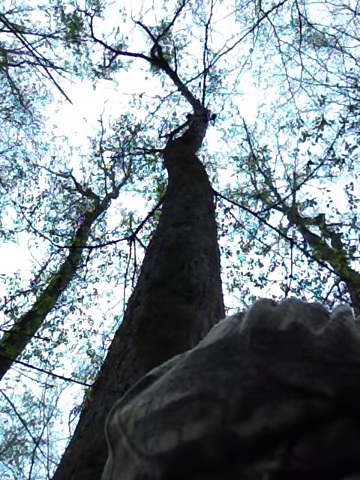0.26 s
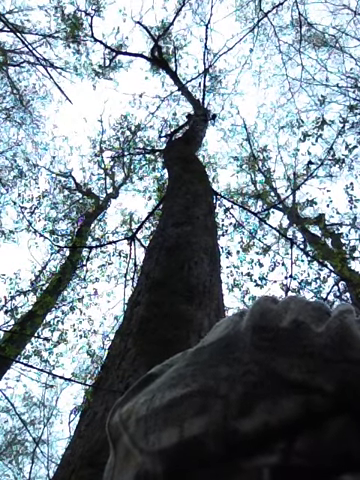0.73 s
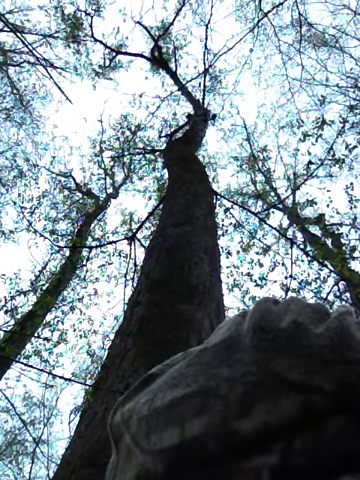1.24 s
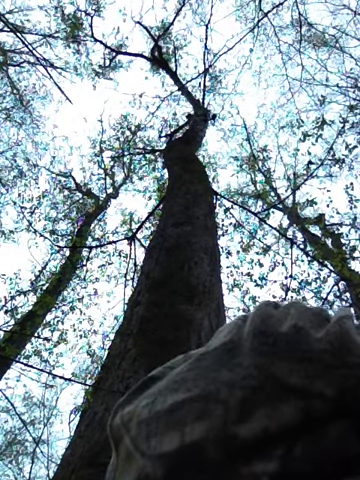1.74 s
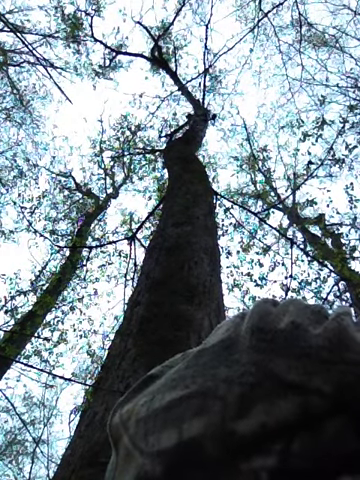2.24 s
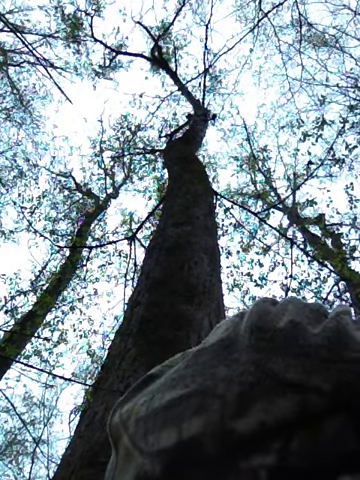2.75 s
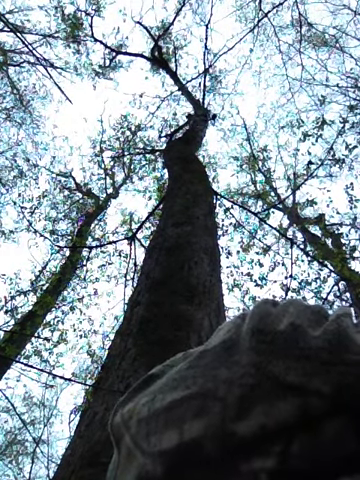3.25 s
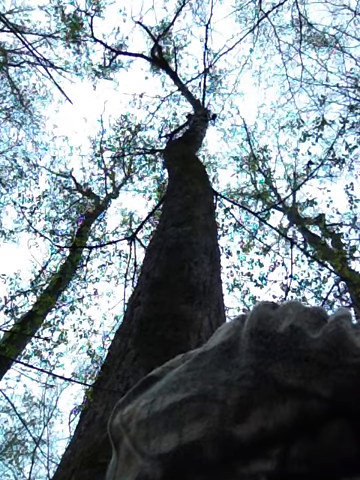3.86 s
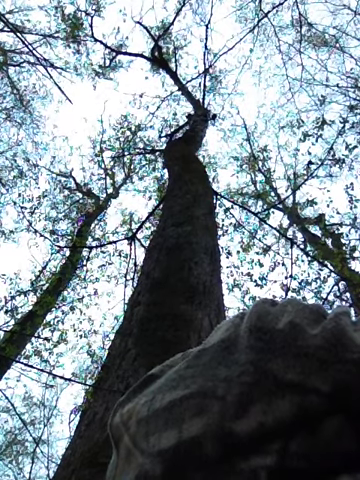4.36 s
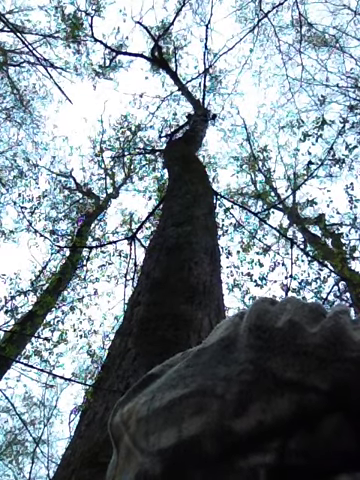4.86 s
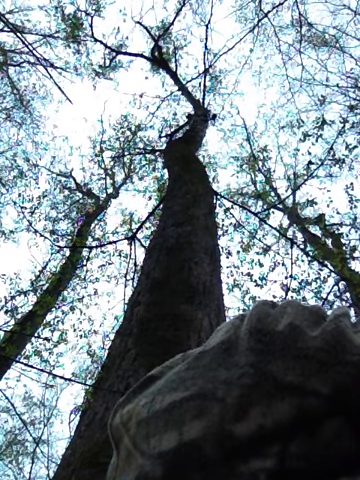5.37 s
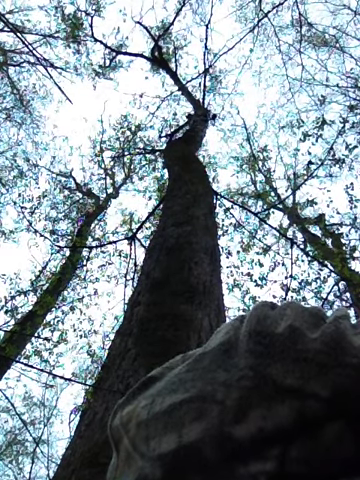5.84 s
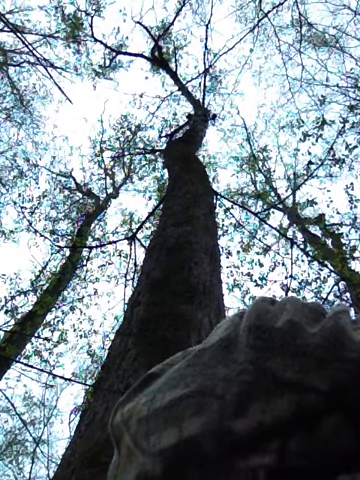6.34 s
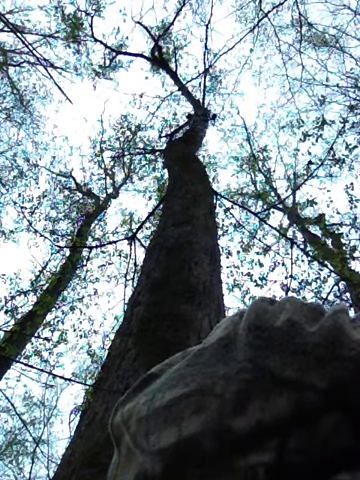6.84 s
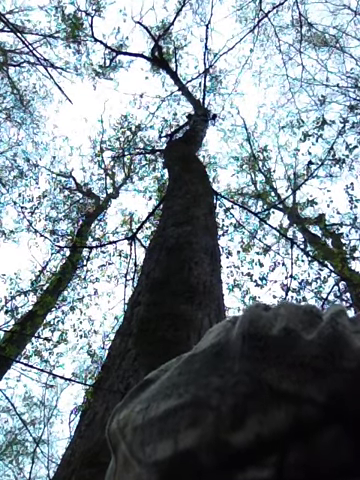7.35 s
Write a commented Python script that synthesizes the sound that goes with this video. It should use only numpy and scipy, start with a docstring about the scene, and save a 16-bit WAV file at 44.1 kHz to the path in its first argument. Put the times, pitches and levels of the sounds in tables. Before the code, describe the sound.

A wild turkey calls loudly, close to the microphone, in still woodland. From about 0.8 to 1.9 seconds it gives five clipped clucks that grow louder, each popping open and breaking upward in pitch. In the pause that follows, a few twigs tick very faintly. Three quick clucks come between 3.1 and 3.5 seconds, then two softer ones at about 4.3 and 4.5 seconds. From 4.9 to 6.8 seconds the turkey gives six slightly longer, raspier rising yelps, evenly spaced at nearly three a second. Every note leaves a faint echo among the trees. At about 7.3 seconds there is a soft, dull knock with a tiny dry snap. Throughout, the background stays very quiet: a low rumble, a steady, slightly crackling hiss and the barely audible hum of a distant engine.

```python
"""Still woodland, one microphone close to a turkey: clipped clucks in short runs, then six longer yelps.
Each note pops open, scoops down and sweeps up as the membranes of the syrinx pulse through the
resonances of throat and beak. A nearby trunk throws back treble and the trees scatter a faint tail.
A few twigs tick and a soft double knock comes near the end. Far off an engine hums, under a low
rumble and a steady, faintly crackling hiss."""
import sys
import numpy as np
from scipy import signal
from scipy.fft import rfft, irfft
from scipy.io import wavfile
from scipy.ndimage import map_coordinates

SR = 44100
rng = np.random.default_rng(int(sys.argv[2]) if len(sys.argv) > 2 else 0)


def materialize(psi):
    """Save the field psi as 16-bit PCM at rate SR to the path in sys.argv[1].

    A 1-D psi becomes a single channel; in a 2-D psi each row is a channel.
    """
    bounded = np.clip(np.atleast_2d(psi).T, -1, 1)
    quanta = np.round(bounded * 32767).astype(np.int16)
    wavfile.write(sys.argv[1], SR, quanta)


N = 335160
TIME = np.arange(N) / SR


def clucks():
    """Clipped notes close to the microphone: the syrinx snaps open and the pitch breaks upward."""
    # t/s, length/s, low pitch/Hz, rise/Hz, level/dB, swell/dB, beak f/Hz, beak level/dB, brightness/dB
    notes = [(.7782, 0.029, 631.5, 221, -31, -7, 2200, -7.5, -0.5),
             (.9292, .027, 658, 205, -24.5, -4, 2230, -4.5, 0),
             (1.1975, 0.059, 678, 234, -20, 7, 2225, -6, 1),
             (1.5338, .039, 666.5, 272, -19, 6.5, 2314, -7, 2),
             (1.8708, 0.04, 673, 280, -18.5, 1, 2320, -5.5, 3.5),
             (3.1182, 0.028, 680.7, 255.5, -23, 1.5, 2370, -8.5, 1),
             (3.2734, 0.028, 634.6, 347, -19.5, -7.5, 2400, -10, 1.5),
             (3.4916, 0.034, 650.3, 404, -18, -2, 2480, -12, -0.5),
             (4.2546, .029, 623.4, 297, -24.5, -2, 2480, -9.5, -2),
             (4.5391, 0.066, 695.7, 165, -29, 9.5, 2260, -14.5, -3.5)]
    # throat resonances: f/Hz, width/Hz, level/dB
    throat = [(965, 166, 4.5), (1453, 243, -7.5), (1793, 320, -5), (2827, 130, -21.5), (3623, 310, -9),
              (4427, 200, -18.5), (6990, 280, -38)]
    return turkey(notes, throat, attack_s=.0051, release_s=.012, glide_share=.4, break_s=.011,
                  sag_db=1, sag_lead_s=.014, sag_width_s=.007, scoop_hz=168.5, scoop_s=.004,
                  jitter=.013, rasp_db=-10, catch_s=.0093, pressed_db=-8.5)


def yelps():
    """Longer, raspier notes from the same spot: a slower opening and a deeper sag in air pressure."""
    # t/s, length/s, low pitch/Hz, rise/Hz, level/dB, swell/dB, beak f/Hz, beak level/dB, brightness/dB
    notes = [(4.8982, 0.09, 629.6, 338.5, -27.5, 4.5, 2350, -10, -1.5),
             (5.2732, 0.07, 610.6, 384, -21.5, 4.5, 2360, -15, -1),
             (5.6519, .076, 629.3, 376, -20.5, 5, 1910, -11, 0),
             (6.0274, 0.072, 620, 372.6, -20.5, 5.5, 2080, -4, -1),
             (6.3924, 0.069, 625.7, 353, -21.5, 4, 2044, -1, 0),
             (6.7672, 0.064, 620, 388, -20.5, -1, 2024, -3, -2)]
    # throat resonances: f/Hz, width/Hz, level/dB
    throat = [(984, 183, 2.5), (1499, 316, 0), (1761, 274, -2), (3090, 910, -14.5), (3773, 424, -15.5),
              (4520, 180, -34.5), (7130, 270, -38)]
    return turkey(notes, throat, attack_s=.01, release_s=.0091, glide_share=.45, break_s=.013,
                  sag_db=2.5, sag_lead_s=.032, sag_width_s=.02, scoop_hz=265.4, scoop_s=.003,
                  jitter=.015, rasp_db=-7.5, catch_s=.015, pressed_db=-2.5)


def turkey(notes, throat, attack_s, release_s, glide_share, break_s, sag_db, sag_lead_s, sag_width_s,
           beak_width_hz=260, size=6144, **voicing):
    """Each note is a short push of air through the syrinx, coloured by throat and beak."""
    out, t, hz = np.zeros(N), TIME[:size], np.fft.rfftfreq(size, 1 / SR)
    for s, length, low_hz, rise_hz, db, swell_db, beak_hz, beak_db, bright_db in notes:
        opening = ease(t / attack_s) * ease((length - t) / release_s)
        pitch_hz = low_hz + rise_hz * pitch_rise(t, length, glide_share, break_s)
        effort = from_db(db + air_pressure(t, length, swell_db, sag_db, sag_lead_s, sag_width_s))
        voice = effort * (pop(t) + syrinx(t, pitch_hz, opening, **voicing))
        resonances = [*throat, (beak_hz, beak_width_hz, beak_db)]
        colour = tract(hz, resonances, bright_db) * antiresonance(hz)
        add(out, s, resonate(voice, colour))
    return out


def syrinx(t, pitch_hz, opening, scoop_hz, scoop_s, jitter, rasp_db, catch_s, pressed_db,
           mellow=.85, flutter_db=6.5, catch_db=9, pressed_hz=720, free_hz=900, count=12):
    """Membrane pulses: the pitch starts sharp and sags; barely driven, the swing is almost a sine."""
    # the membrane catches roughly before it settles into its swing
    catch = from_db(catch_db * np.exp(-t / catch_s))
    hz = (pitch_hz + scoop_hz * np.exp(-t / scoop_s)) * (1 + jitter * catch * drift(1400, len(t)))
    phase = 2 * np.pi * np.cumsum(hz) / SR
    overtone = np.arange(count)[:, None]
    # uneven closure makes the high overtones flutter, each on its own
    level_db = flutter_db * overtone / count * np.array([drift(150, len(t)) for _ in overtone])
    # the low, pressed part of a note has a weak fundamental, which fills out as the pitch rises
    level_db[0] += np.interp(hz, [pressed_hz, free_hz], [pressed_db, 0])
    pulses = (np.cos((overtone + 1) * phase) * from_db(level_db) * opening ** (mellow * overtone)).sum(0)
    shimmer = 1 + .09 * catch * drift(500, len(t))
    # turbulence comes in a puff with every cycle, brighter than the tone, and starts ahead of it
    turbulence = signal.lfilter(*signal.butter(1, 1600, "high", fs=SR), rng.standard_normal(len(t)))
    rasp = from_db(rasp_db) * catch * (1 + np.cos(phase)) * turbulence
    return opening * pulses * shimmer + np.sqrt(opening) * rasp


def pitch_rise(t, length, glide_share, break_s, lead_s=.0043):
    """Share of the rise: a steady glide steepens into an upward break and tops out just before the end."""
    top_s = length - lead_s
    held = np.minimum(t, top_s)
    return glide_share * held / top_s + (1 - glide_share) * np.exp((held - top_s) / break_s)


def air_pressure(t, length, swell_db, sag_db, sag_lead_s, sag_width_s):
    """The push behind a note in dB: it swells or fades evenly, and sags before the voice breaks upward."""
    along = np.minimum(t / length, 1)
    sag = np.exp(-((t - length + sag_lead_s) / sag_width_s) ** 2)
    return swell_db * (along - .5) - sag_db * sag


def pop(t, db=-12, hz=880, rise_s=.0018):
    """As the syrinx opens, the first puff of air sets the throat ringing for a few cycles."""
    return from_db(db) * t / rise_s * np.exp(1 - t / rise_s) * np.sin(2 * np.pi * hz * t)


def tract(hz, resonances, bright_db, low_hz=690, bright_hz=2700, top_hz=8000,
          edge_hz=4750, reopen_hz=5400, reopen_width_hz=900, notch_db=-30, leak_db=-72):
    """Gain of throat and beak: resonance peaks, dark below the voice, deeply notched above the main peaks."""
    peaks = sum(from_db(db) / (1 + (2 * (hz - centre) / width) ** 2) for centre, width, db in resonances)
    band = 1 / np.sqrt((1 + (low_hz / np.maximum(hz, 1)) ** 8) * (1 + (hz / top_hz) ** 24))
    edge = 1 / np.sqrt(1 + (hz / edge_hz) ** 50)
    reopening = np.clip((hz - reopen_hz) / reopen_width_hz, from_db(notch_db), 1)
    notch = np.maximum(edge, reopening)
    return peaks * from_db(bright_db * (hz > bright_hz)) * band * notch + from_db(leak_db)


def antiresonance(hz, centre_hz=2660, width_hz=260, db=-9):
    """A dip in the throat's gain parts the beak resonance from the upper peaks."""
    return from_db(db / (1 + (2 * (hz - centre_hz) / width_hz) ** 2))


def resonate(x, gain):
    """Minimum-phase filter with the given gain per FFT bin: it rings after the drive, never before."""
    cepstrum, half = irfft(np.log(gain)), len(x) // 2
    cepstrum[1:half] *= 2
    cepstrum[half + 1:] = 0
    return irfft(rfft(x) * np.exp(rfft(cepstrum)))


def trunk(x, delay_s=.0024, echo_db=-9, low_hz=2600):
    """A nearby trunk throws back treble: overtones fade in and out as they sweep through the comb."""
    treble = signal.lfilter(*signal.butter(2, low_hz, "high", fs=SR), x)
    return x + from_db(echo_db) * np.interp(TIME - delay_s, TIME, treble)


def knock(body_db=-5, scuff_db=-15, scuff_t60=.022, scuff_top_hz=4000, low_hz=260, size=8192):
    """A dull double bump without deep bass: a few damped modes under a brief scuff."""
    # the two bumps: t/s, level/dB
    bumps = [(7.2855, -40.5), (7.2944, -34.5)]
    # their modes: f/Hz, level/dB, t60/s
    modes = [(326, -18.5, 0.15), (436, -1.5, 0.053), (600, -4, 0.033), (715, 0.5, 0.034), (982, 0, 0.034),
             (1470, -14, .02), (2600, -9.5, 0.013)]
    out, t = np.zeros(N), TIME[:size]
    for s, db in bumps:
        body = sum(from_db(level - 60 * t / t60) * np.sin(2 * np.pi * hz * t) * rng.choice([-1, 1])
                   for hz, level, t60 in modes)
        grit = signal.lfilter(*signal.butter(1, scuff_top_hz, fs=SR), rng.standard_normal(size))
        bump = from_db(body_db) * body + from_db(scuff_db - 60 * t / scuff_t60) * rms_one(grit)
        add(out, s, from_db(db) * signal.lfilter(*signal.butter(2, low_hz, "high", fs=SR), bump))
    return out


def twigs(size=2048):
    """Tiny dry snaps among the trees, each a burst around one broad resonance."""
    # snaps: t/s, level/dB, f/Hz, t60/s
    ticks = [(.482, -62, 1660, .015), (2.126, -61, 7000, .012), (2.178, -62, 1740, .04),
             (2.437, -57, 1600, .015), (2.624, -60, 2100, .014), (2.962, -57, 3300, .018),
             (7.329, -50, 14000, .014), (7.343, -59, 5800, .029)]
    out = np.zeros(N)
    for s, db, hz, t60 in ticks:
        burst = signal.lfilter(*signal.iirpeak(hz, Q=1.8, fs=SR), rng.standard_normal(size))
        add(out, s, from_db(db - 60 * TIME[:size] / t60) * rms_one(burst))
    return out


def woodland(x, leaves_db=-17, leaves_t60=.087, leaves_low_hz=2600, first_echo_s=.0072,
             ground_s=.017, ground_db=-29, size=65536):
    """One faint echo off the ground, brief treble off near leaves, a long darkening tail off far trees."""
    # bands of the tail: f/Hz, level/dB, t60/s
    tail = [(700, -36.5, 2.3), (1430, -29.5, 1.14), (2240, -31.5, 0.68), (2870, -19.5, 0.53),
            (3940, -30.5, 0.59), (7000, -11.5, 0.28)]
    t, log_hz = TIME[:size], np.log(np.maximum(np.fft.rfftfreq(size, 1 / SR), 1))
    arrived = t > first_echo_s
    highpass = signal.butter(3, leaves_low_hz, "high", fs=SR, output="sos")
    leaves = signal.sosfilt(highpass, rng.standard_normal(size))
    response = from_db(leaves_db) * rms_one(leaves * arrived * from_db(-60 * t / leaves_t60))
    scatter = rfft(rng.standard_normal(size))
    centres = np.log([row[0] for row in tail])
    for (_, db, t60), share in zip(tail, np.eye(len(tail))):
        band = irfft(scatter * np.interp(log_hz, centres, share))
        response += from_db(db) * band * rms_one(arrived * from_db(-60 * t / t60))
    ground = from_db(ground_db) * np.interp(TIME - ground_s, TIME, x)
    return ground + signal.fftconvolve(x, response / np.sqrt(size))[:N]


def far_engine(hz=107.5, wander=.0033, waver_db=1.5):
    """An engine a long way off: its note and the octave swell and fade separately."""
    # course of the hum: t/s, fundamental rms/dB, octave rms/dB
    hum = [(0.0, -76.5, -71.5), (1.72, -83, -76), (2.36, -72.5, -61.5), (2.91, -70, -71.5),
           (5.57, -86.5, -75), (6.09, -82, -95), (7.2, -76.5, -74.5)]
    s, *levels = np.transpose(hum)
    phase = 2 * np.pi * np.cumsum(hz * (1 + wander * drift(4.15, N))) / SR
    out = np.zeros(N)
    for harmonic, db in enumerate(levels, 1):
        level = from_db(np.interp(TIME, s, db) - waver_db * drift(1.1, N))
        out += np.sqrt(2) * level * np.sin(harmonic * phase)
    return out


def whine(hz=560, db=-82, wander=.033):
    """A very faint tone that wavers in pitch."""
    phase = 2 * np.pi * np.cumsum(hz * (1 + wander * drift(25, N))) / SR
    return from_db(db) * np.sin(phase)


def noise_bed(rumble_db=-65, hiss_db=-71):
    """A low rumble and a steady hiss lie behind everything."""
    # spectra of the two noises: f/Hz, relative density/dB
    rumble = [(25, -38), (50, -35), (75, -23), (100, -13), (140, -8), (220, -3.5), (350, -12), (560, -14.5),
              (800, -21.5), (1500, -35), (3000, -58)]
    hiss = [(400, -24.5), (900, 0.5), (1600, 2), (3200, -2), (7600, -5.5), (9800, -9), (11700, -10.5),
            (15400, -2)]
    return from_db(rumble_db) * coloured_noise(rumble) + from_db(hiss_db) * coloured_noise(hiss)


def crackle(per_s=90, centre_hz=9700, spread_db=4, t60=.0054, size=512):
    """The hiss crackles faintly: soft, very short specks of treble."""
    # course of the crackle: t/s, level/dB
    levels = [(0, -78), (1.8, -78.5), (2.3, -83), (5.0, -80), (7.6, -82.5)]
    specks = (rng.random(N) < per_s / SR) * from_db(spread_db * rng.uniform(-1, 1, N))
    envelope = np.convolve(specks, from_db(-60 * TIME[:size] / t60))[:N]
    bursts = envelope * rng.standard_normal(N) + 1e-18
    grains = signal.lfilter(*signal.iirpeak(centre_hz, Q=5, fs=SR), bursts)
    return from_db(np.interp(TIME, *np.transpose(levels))) * rms_one(grains)


def coloured_noise(spectrum):
    """Steady noise with the given spectrum; rms 1."""
    hz, db = np.transpose(spectrum)
    bins = np.maximum(np.fft.rfftfreq(N, 1 / SR), 1)
    gain = from_db(np.interp(np.log(bins), np.log(hz), db))
    return rms_one(irfft(rfft(rng.standard_normal(N)) * gain, N))


def drift(rate_hz, size):
    """Smooth random wander with spread 1."""
    knots = rng.standard_normal(size)
    return map_coordinates(knots, [np.arange(size) * rate_hz / SR], order=1) * np.sqrt(3 / 2)


def ease(share):
    """A rounded ramp from 0 to 1."""
    return np.sin(np.pi / 2 * np.clip(share, 0, 1))


def from_db(db):
    return 10 ** (np.asarray(db) / 20)


def rms_one(x):
    return x / np.sqrt(np.mean(x ** 2) + 1e-20)


def add(track, s, sound):
    """Mix a sound into a track from time s on."""
    at = round(s * SR)
    track[at:at + len(sound)] += sound[:N - at]


def scene():
    """The bird and the small noises near the microphone, their echoes, and the background; mono."""
    near = trunk(clucks() + yelps()) + twigs() + knock()
    return (near + woodland(near) + far_engine() + whine() + noise_bed() + crackle())[None]


def record(dry, cutoff_hz=15400):
    """The top of the microphone's signal is cut steeply."""
    return signal.sosfilt(signal.ellip(12, .1, 70, cutoff_hz, fs=SR, output="sos"), dry)


dry = scene()
out = record(dry)
materialize(out)
```